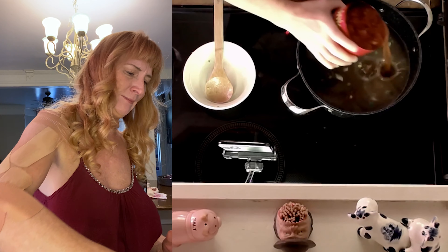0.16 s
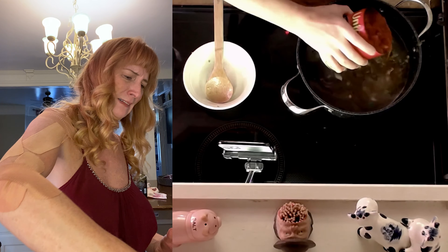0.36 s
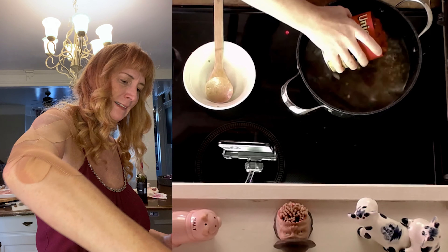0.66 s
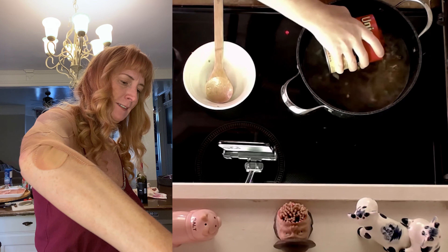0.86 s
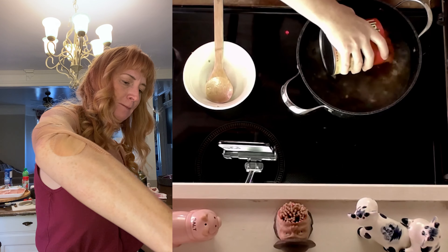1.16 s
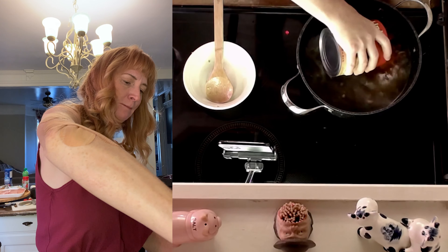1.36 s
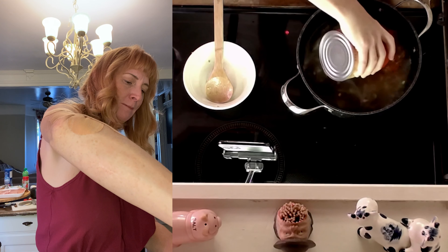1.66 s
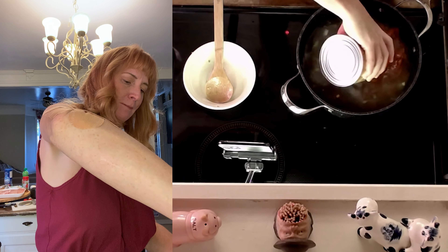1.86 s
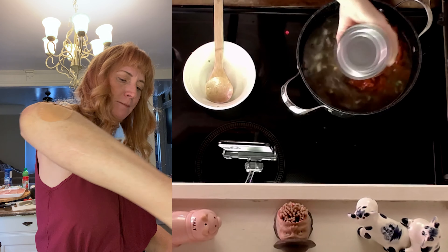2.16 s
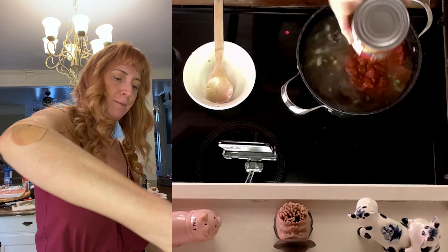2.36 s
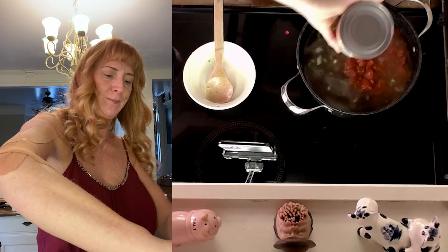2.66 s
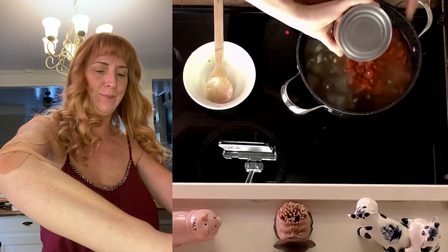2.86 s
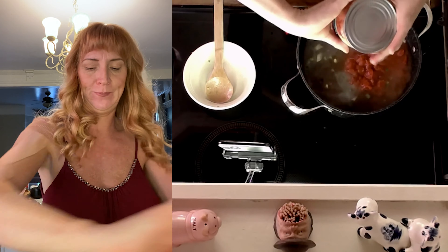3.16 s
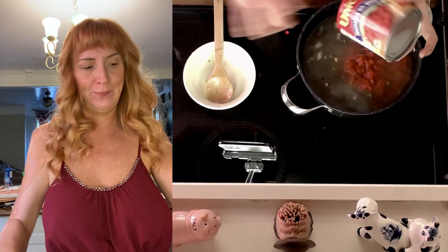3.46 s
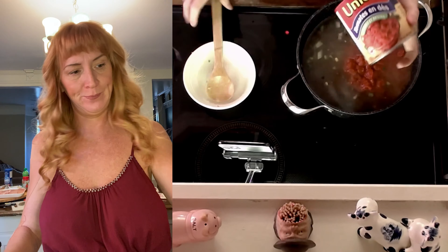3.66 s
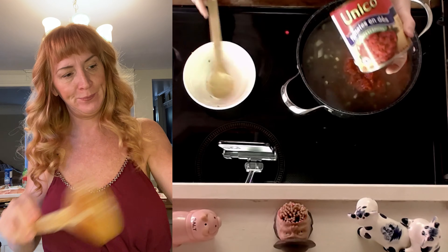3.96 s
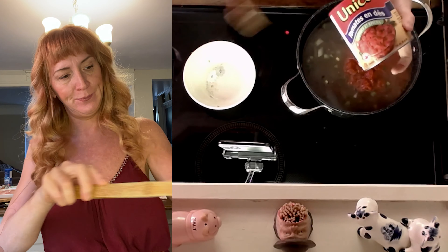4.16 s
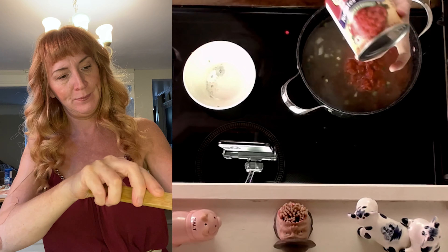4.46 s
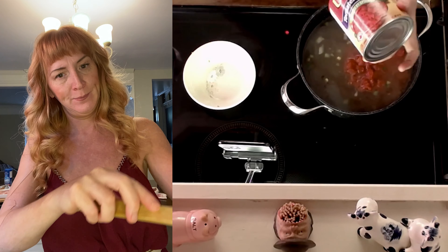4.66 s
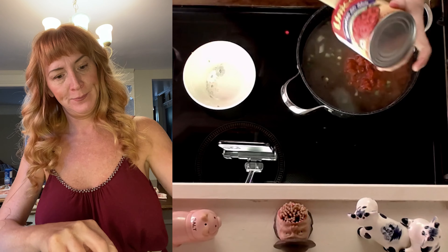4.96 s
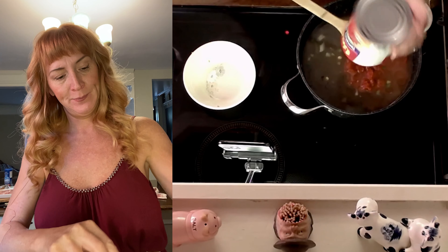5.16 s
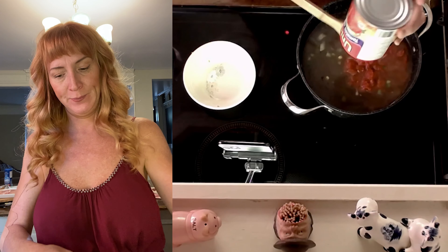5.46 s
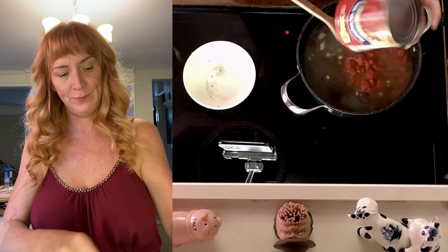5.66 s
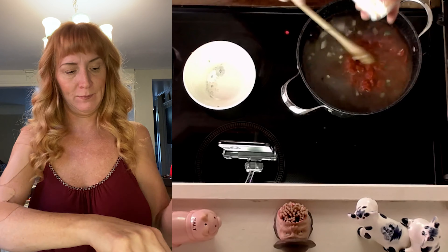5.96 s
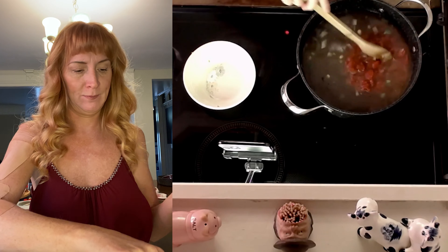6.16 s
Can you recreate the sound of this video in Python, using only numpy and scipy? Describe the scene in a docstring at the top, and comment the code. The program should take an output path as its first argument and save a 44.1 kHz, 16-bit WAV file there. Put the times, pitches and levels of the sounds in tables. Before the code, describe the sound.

In a small, fairly live kitchen, chunky tomatoes slide from a tin into broth with sharp wet slaps, squelches, bubbly plops and soft thuds. The gush thins to dribbles while a hand rubs the tin. A wooden spoon rattles quickly against a china bowl, then knocks inside the hollow can and scrapes it once, ending with light rim taps. Close stereo microphone, low stove rumble beneath.

```python
"""Over a low rumble, tomatoes slide from a tin into a pot of broth: bubble and film noise, squelches, plops of
gliding cavity tones and soft bass thuds. Then a hand shifts on the tin (stuttering friction noise), a wooden
spoon rattles against its bowl (decaying modes, clack, cooktop thump), and knocks and scrapes in the hollow tin
(struck modes, stick-slip exciting resonances), with light rim taps, high wet ticks in the broth and a brief
stir of the broth at the end. A small, fairly live kitchen answers into two close microphone ports."""
import sys
import numpy as np
from scipy import signal
from scipy.fft import rfft, irfft
from scipy.io import wavfile
from scipy.ndimage import uniform_filter1d

SR = 44100
rng = np.random.default_rng(int(sys.argv[2]) if len(sys.argv) > 2 else 0)


def output_pcm(signal):
    """Save a mono or channel-first signal as 16-bit PCM at the path in sys.argv[1].

    Samples are clipped to [-1, 1] before scaling.
    """
    pcm = np.clip(np.atleast_2d(signal).T, -1, 1) * 32767
    wavfile.write(sys.argv[1], SR, np.round(pcm).astype(np.int16))


N = 278094
TIME = np.arange(N) / SR  # s

# Levels are relative: each source sets its own balance.
# low rumble of pot and stove over time: t/s, level/dB
RUMBLE_LEVEL = [(0.0, -58), (0.21, -43.5), (0.45, -54), (1.3, -56.5), (1.75, -52), (2.8, -56), (4.1, -63),
                (5.151, -58.5), (5.55, -73.5), (5.7, -56.5), (6.31, -77)]
# rumble spectrum: f/Hz, level/dB
RUMBLE_SPECTRUM = [(20, -23), (40, -4.5), (55, 1), (68, 8), (90, -8), (125, -6.5), (165, -7), (230, -15.5),
                   (330, -24), (500, -35.5), (900, -77)]
# room air spectrum: f/Hz, level/dB
AIR_SPECTRUM = [(88, -33), (150, 5), (249, -8.5), (291, -8), (649, -19), (702, -14.5), (805, -22),
                (871, -13.5), (1170, -27), (1290, -18), (1450, -11.5), (4950, -37), (16000, -36)]
AIR_DB = -71.5
RUMBLE_WAVER_DB, RUMBLE_WAVER_HZ = 4, 6

# pulp running into the pot, first the gush, then dribbles, lastly a brief stir of the broth: start t/s, length
# t/s, bubble level/dB, crackle level/dB
FLOWS = [(0.013, 1.13, -52.5, -55.5), (1.438, 0.37, -63, -63.5), (2.094, 0.47, -76, -70.5),
         (6.225, 0.086, -89, -72)]
# drops in the broth, spectrum: f/Hz, level/dB
BUBBLE_SPECTRUM = [(200, -21.5), (450, -2.5), (700, -3), (1100, -6.5), (1800, -9.5), (3000, -16.5),
                   (4200, 5), (5500, -10.5), (8000, -22), (16000, -49)]
# sloshing broth, spectrum: f/Hz, level/dB
SLOSH_SPECTRUM = [(150, -10), (300, -3.5), (450, 3), (650, -1), (1000, -7.5), (1800, -6.5), (4200, -4),
                  (5500, -14.5), (8000, -24.5)]
# bursting films, spectrum: f/Hz, level/dB
CRACKLE_SPECTRUM = [(1000, -11), (4000, -10.5), (5500, -5), (7200, -7.5), (10000, -5), (13500, -3.5),
                    (16000, -16.5)]
FLOW_ATTACK_S, FLOW_SAG_DB_PER_S, FLOW_RELEASE_S = 0.026, -9.5, 0.3
LUMP_DB, LUMP_HZ = 3, 21.83  # the pulp comes in lumps

# chunks slapping into the pot: t/s, squelch level/dB, squelch centre f/Hz, tick level/dB, t60/s
SPLATS = [(0.029, -26, 3600, -48, 0.062), (0.039, -19.5, 3150, -23.5, 0.024),
          (0.0612, -30.5, 2330, -43, .03), (0.114, -31, 3200, -57, 0.047),
          (0.1296, -35, 2150, -39.5, 0.076), (0.2665, -46, 1220, -42.5, 0.028),
          (0.3117, -44.5, 1590, -39.5, .025), (0.387, -46.5, 1220, -43.5, 0.11),
          (0.436, -36.5, 1110, -55, 0.027), (0.487, -47.5, 1180, -47, 0.046),
          (0.7146, -45, 3700, -51.5, 0.022), (0.7784, -33.5, 1470, -39, 0.033),
          (0.832, -34, 4030, -55.5, .015), (0.8861, -29, 2700, -28, 0.096), (0.98, -34.5, 2050, -48, 0.029),
          (1.005, -37, 4250, -39, 0.027), (1.051, -25, 3950, -24.5, .03), (1.061, -25, 1950, -41, 0.042),
          (1.164, -42, 3130, -43, .025), (1.3361, -51, 1480, -55, 0.035), (1.501, -40.5, 4100, -57, 0.021),
          (1.644, -38.5, 3930, -42.5, 0.018), (1.699, -46.5, 2090, -62, 0.045),
          (1.7544, -39.5, 2190, -51.5, 0.015), (2.176, -57, 1640, -53.5, 0.027),
          (2.287, -48, 3440, -58, 0.022), (2.4072, -63, 1640, -57, 0.022), (2.993, -40.5, 2780, -52, 0.11)]
# dull push of pulp, spectrum: f/Hz, level/dB
PULP_SPECTRUM = [(120, -22), (300, -9.5), (480, 0.5), (680, 3), (1000, -19.5), (3000, -24)]
# crisp contact tick, spectrum: f/Hz, level/dB
TICK_SPECTRUM = [(1000, -34.5), (4000, -3.5), (5500, 0.5), (7000, 0.5), (10000, -4.5), (13000, -6.5),
                 (16000, -13.5)]
SPLAT_RISE_S = 0.0032

# air pockets closing behind the chunks: t/s, level/dB, settled f/Hz
PLOPS = [(.041, -5, 3866), (.044, -34, 708), (.061, -30.5, 2150), (.114, -25.5, 2910), (0.223, -34.5, 1616),
         (0.435, -39, 1142), (0.754, -36.5, 1830), (.78, -31.5, 1397), (.904, -28, 664),
         (0.959, -31.5, 2420), (0.981, -39, 686), (1.06, -22.5, 1983), (1.071, -34, 853),
         (1.131, -31, 2960), (1.502, -30.5, 4020), (1.635, -40, 1430)]
POCKET_HZ, POCKET_CYCLES = 1680, 59  # a pocket starts above POCKET_HZ and falls 60 dB in so many cycles

# lumps landing on the bottom of the pot: t/s, level/dB, mid-glide f/Hz, t60/s
THUDS = [(.046, -28, 118.3, 0.29), (0.623, -38, 160, 0.15), (0.891, -28.5, 127, 0.066),
         (1.562, -39.5, 149, 0.065), (1.686, -36, 155, 0.11), (1.79, -34, 143, 0.1),
         (2.999, -34, 129, 0.11)]

# hand and spoon sliding on the tin, one row a stroke:
# start t/s, length t/s, body level/dB, hiss level/dB
SLIDES = [(1.306, .3, -63.5, -66), (1.594, 0.073, -61.5, -59), (1.703, 0.18, -57.5, -69.5),
          (1.942, 0.38, -60, -63.5), (2.419, 0.34, -55.5, -65), (2.813, 0.074, -63, -52.5),
          (2.977, 0.082, -50, -58), (3.063, 0.078, -55.5, -50.5), (3.196, 0.28, -64, -85),
          (3.947, 0.086, -62.5, -68.5), (4.493, 0.48, -57.5, -86), (5.373, 0.039, -67, -62),
          (5.45, 0.33, -70.5, -69), (5.867, 0.045, -71.5, -79.5)]
# dull body of the friction, spectrum: f/Hz, level/dB
SLIDE_BODY = [(120, -16.5), (200, -4.5), (320, -9), (490, -2), (680, -13), (850, -5.5), (1150, -19),
              (1700, -15.5), (2780, -14.5), (4100, -15.5), (5600, -29), (8000, -52.5)]
# fine hiss of the friction, spectrum: f/Hz, level/dB
SLIDE_HISS = [(3000, -37), (5500, -5.5), (7500, 0), (10000, -1), (13500, -0.5), (16000, -4.5)]
SLIDE_ATTACK_S, SLIDE_SAG_DB_PER_S, SLIDE_RELEASE_S = 0.028, -8.5, 0.22
STUTTER_DB, STUTTER_HZ = 2.5, 38  # skin sticks and slips on the tin

# spoon against bowl: t/s, force level/dB, brightness/(dB per octave), cooktop thump level/dB
BOWL_KNOCKS = [(3.4583, -28, 0, -10), (3.4667, -8.5, 1, -3), (3.483, -6.5, -2, 0.5), (3.488, -6, -2.5, -2),
               (3.504, -23.5, -3, 10), (3.531, -19, -4.5, 6), (3.61, -15.5, -1.5, -6),
               (3.6238, -4.5, -1, -5), (3.684, -14, -1.5, -7.5), (3.6948, 1.5, 0.5, -3),
               (3.706, -16.5, -9, -15), (3.742, -25.5, 3, 9.5), (3.7649, -4, -0.5, -2)]
# modes of the china bowl: f/Hz, level/dB, t60/s
BOWL_MODES = [(327.5, -33.5, 0.31), (457, -16, 0.064), (507, -25, 0.22), (529, -29.5, 0.18),
              (869, -28.5, 0.27), (952, -26, 0.071), (1104, -29, 0.12), (1464, -31.5, 0.13),
              (1970, -20, 0.079), (1810, -29, .06), (2170, -30, 0.026), (2485, -38, 0.18),
              (2590, -28.5, 0.12), (4060, -35, .12), (7110, -33.5, 0.07), (10900, -46.5, 0.1),
              (11400, -47.5, 0.078), (12600, -49, .08)]
# wood on china, clack spectrum: f/Hz, level/dB
BOWL_CLACK = [(100, -9), (420, 0.5), (700, -3.5), (1300, -4.5), (2000, -4), (2900, -4.5), (4200, -10),
              (5500, -21), (9000, -35.5), (13000, -35.5), (16000, -54)]
# modes of the glass cooktop: f/Hz, level/dB, t60/s
COOKTOP_MODES = [(65.7, -33.5, 0.45), (104.5, -20.5, 0.25), (150.3, -18.5, 0.24), (230, -37, 0.35)]

# spoon against tin: t/s, force level/dB, brightness/(dB per octave), held-tin thump level/dB
TIN_KNOCKS = [(4.313, -36.5, 4.5, -9), (4.3352, -3, -2, -22), (4.354, -20.5, -3.5, -20),
              (4.448, -24.5, 3, -13.5), (4.4648, -13, 3, 7.5), (4.8, -15.5, -4, -17.5),
              (4.867, -22.5, 8, -10)]
# modes of the air in the tin and its wall: f/Hz, level/dB, t60/s
TIN_MODES = [(127, -40, 0.23), (313.4, -33.5, 0.13), (486, -20.5, .2), (532, -11.5, 0.17),
             (559.7, -5.5, .04), (629, -17, 0.088), (890.4, -18.5, 0.13), (1000, -17.5, 0.051),
             (1275, -18.5, 0.071), (1450, -21, 0.052), (2079, -30.5, 0.075), (2210, -33.5, 0.048),
             (2840, -29, 0.072)]
# wood on tin, clack spectrum: f/Hz, level/dB
TIN_CLACK = [(150, -27.5), (400, -4), (600, 6), (1000, -9.5), (1600, -12.5), (2900, -19), (4200, -25),
             (5500, -37.5), (11000, -46), (16000, -60)]
# dull body of the held tin, spectrum: f/Hz, level/dB
TIN_BODY = [(80, -29), (150, -2.5), (200, -4.5), (300, 6.5), (400, -7.5), (700, -2.5), (1100, -21),
            (2000, -11.5), (5000, -39.5)]

# rasp of wood on the tin wall, spectrum: f/Hz, level/dB
RASP_SPECTRUM = [(90, -26), (150, -6.5), (400, -12.5), (900, -6), (1150, -9), (1700, -3.5), (2050, -1.5),
                 (2750, 5), (3300, -10.5), (4000, 0), (5300, -17), (7000, -17.5), (11000, -38),
                 (16000, -50.5)]
# the spoon first wipes through the wet film
WIPE_START_S, WIPE_ATTACK_S, WIPE_DB_PER_S, WIPE_DB = 4.596, 0.15, 49, -64.5
# it then glides in with growing pressure, bites into the wall and lets go
DRAG_START_S, BITE_START_S, DRAG_END_S = 4.697, 4.812, 4.876
DRAG_ATTACK_S, PRESS_DB_PER_S, DRAG_RELEASE_S = 0.062, 157, 0.09
BITE_ATTACK_S, BITE_RELEASE_S = 0.0056, 0.054
HOLLOW_HZ, HOLLOW_SAG_HZ_PER_S = 653.6, 276  # the air in the tin sinks in pitch as the spoon goes in
HOLLOW_DB, GLIDE_RASP_DB, BITE_RASP_DB = -38.5, -66.5, -28.5  # as each sets in
AFTER_RING_DB, AFTER_RING_S = -34.5, 0.41  # the bottom of the tin rings on with this t60

# light high tinks: taps of the spoon on the rim of the tin and wet ticks in the broth: t/s, level/dB, f/Hz
TINKS = [(4.9833, -51, 10800), (5.055, -33.5, 4699), (5.394, -48.5, 11340), (5.783, -43.5, 4677)]
TINK_T60_S, TINK_TICK_DB = 0.031, -15

# reverberation of the kitchen: f/Hz, t60/s
KITCHEN_T60 = [(100, 0.27), (400, 0.38), (900, 0.58), (2500, 0.6), (6000, 0.46), (10000, 0.49),
               (14000, 0.22)]
# reflections alike in both ports: f/Hz, level/dB
ROOM_SHARED = [(25, -13), (100, 6.5), (500, 1), (1200, -1), (2600, -1.5), (6000, -6.5), (14000, 1)]
# reflections that differ between the ports: f/Hz, level/dB
ROOM_APART = [(60, -34), (150, -24), (300, -13), (550, -5), (1200, -1), (2600, 1), (6000, -4), (14000, -6)]
# microphone response: f/Hz, level/dB
MICROPHONE = [(20, -11.5), (40, -4), (60, -1), (10000, 2), (13000, -1.5), (14500, -3), (16000, -13)]
EDGE_HZ = 15800  # upper band limit


def amp(db):
    """Logarithmic level: decibels to gain."""
    return 10 ** (np.asarray(db) / 20)


def unit(x):
    """Normalisation: scales to an rms of one."""
    return x / np.sqrt(np.mean(x ** 2) + 1e-20)


def read(points, hz):
    """Interpolation of a spectrum along log frequency."""
    f, value = np.transpose(points)
    return np.interp(np.log(hz + 1), np.log(f + 1), value)


def swell(s, db):
    """Amplitude modulation: gain from a level curve, -120 dB outside it."""
    return amp(np.interp(TIME, s, db, left=-120, right=-120))


def add(mix, s, sound):
    """Superposition: mixes a sound in at time s."""
    part = mix[max(round(s * SR), 0):][:len(sound)]
    part += sound[:len(part)]


def colour(x, points):
    """Minimum-phase filtering: a causal filter with the given spectrum."""
    hz = abs(np.fft.fftfreq(4096, 1 / SR))
    log_gain = np.log(amp(read(points, hz)))
    # the Hilbert transform of the log gain supplies the phase
    taps = np.fft.ifft(np.exp(np.conj(signal.hilbert(log_gain)))).real
    return signal.fftconvolve(x, taps[:len(taps) // 2])[:len(x)]


def fade(t, t60):
    """Exponential damping: 60 dB in t60."""
    return np.exp(-np.log(1000) * t / np.maximum(t60, 1e-3))


def stroke(start, length, attack, slope_db, release):
    """Envelope: smooth attack, hold sloping by slope_db a second, exponential release of the given t60."""
    t = np.maximum(TIME - start, 0)
    onset = np.sin(np.pi / 2 * np.minimum(t / attack, 1)) ** 2
    return onset * amp(slope_db * np.minimum(t, length)) * fade(np.maximum(t - length, 0), release)


def wobble(hz):
    """Sum of sines at random phases: irregular motion of rms one around the given rate."""
    rates = hz * np.geomspace(.5, 2, num=12)
    return unit(sum(np.sin(2 * np.pi * (f * TIME + rng.random())) for f in rates))


def noise(points):
    """Spectral shaping: steady noise of rms one with the given spectrum."""
    white = rfft(rng.standard_normal(N))
    return unit(irfft(white * amp(read(points, np.fft.rfftfreq(N, 1 / SR))), N))


def grains(per_s, spread_db):
    """Random point process: clicks of uneven size and sign."""
    size = amp(spread_db * np.minimum(rng.exponential(1, N), 3.5))
    return size * rng.choice([-1, 1], N) * (rng.random(N) < per_s / SR)


def clumping(length, window):
    """Moving average of noise: slow random motion of rms one, window in samples."""
    return unit(uniform_filter1d(rng.standard_normal(length), size=window))


def bubbles(low_hz, high_hz, per_s, cycles, glide):
    """Damped bubble resonance: ringing drops of 18 sizes, each size bending up or down to its pitch."""
    t, out = TIME[:SR // 12], np.zeros(N)
    for hz in np.geomspace(low_hz, high_hz, num=18):
        pitch = hz * (1 + glide * rng.uniform(-0.55, 1) * np.exp(-t / 0.0036))
        envelope = fade(t, cycles / hz) * (1 - np.exp(-t * hz / 2))
        drip = np.sin(2 * np.pi * np.cumsum(pitch) / SR) * envelope
        out += signal.oaconvolve(grains(per_s, spread_db=6.5), drip * hz)[:N]
    return unit(out)


def spray(points, t60, rise, clump=0.98):
    """Clumped noise burst: tiny ruptures with the given spectrum, scaled by the rms of the first 10 ms."""
    t = TIME[:SR // 5]
    clumps = np.exp(clump * np.tanh(clumping(len(t), 40)))
    envelope = fade(t, t60) * (1 - np.exp(-t / rise))
    burst = colour(rng.standard_normal(len(t)) * clumps * envelope, points)
    return burst / np.sqrt(np.mean(burst[:SR // 100] ** 2))


def ring(modes, tilt, rise, scatter=0.0067):
    """Modal synthesis: damped modes of a struck body in close pairs; tilt in dB per octave brightens them."""
    t, tones = TIME[:SR // 2], 0
    for k, (hz, db, t60) in enumerate(modes):
        # each blow detunes the pair slightly at random, so its ring beats and varies a little
        own, twin = hz * (1 + scatter * rng.standard_normal(2) * [.5, 2])
        pair = np.sin(2 * np.pi * own * t) + .5 * np.sin(2 * np.pi * twin * t)
        gain = (-1) ** k * amp(db - 1.5 + tilt * np.log2(hz / 800))
        tones = tones + gain * fade(t, t60) * pair
    return tones * (1 - np.exp(-t / rise))


def clack(points, tilt, t60):
    """High modal density: quickly damped noise stands for the crowded modes at a contact."""
    t = TIME[:SR // 2]
    burst = rng.standard_normal(len(t)) * fade(t, t60) * (1 - np.exp(-t / 0.00013))
    tilted = [(hz, db + tilt * np.log2(hz / 800)) for hz, db in points]
    return colour(burst / np.linalg.norm(burst), tilted)


def resonate(x, hz, width):
    """Resonance: a one-pole filter of bandwidth width/Hz, turned to follow the pitch curve hz."""
    turn = np.exp(2j * np.pi * np.cumsum(hz * np.ones(N)) / SR)
    r = np.exp(-np.pi * width / SR)
    return 2 * (turn * signal.lfilter([1 - r], [1, -r], x / turn)).real


def background():
    """Coherence: wavering rumble is alike in both ports, still air has a small part that differs."""
    waver = amp(RUMBLE_WAVER_DB * wobble(RUMBLE_WAVER_HZ))
    rumble = amp(2.0) * noise(RUMBLE_SPECTRUM) * swell(*np.transpose(RUMBLE_LEVEL)) * waver
    apart = np.array([noise(AIR_SPECTRUM), noise(AIR_SPECTRUM)])
    return rumble + amp(AIR_DB) * (noise(AIR_SPECTRUM) + 0.2 * apart)


def patter():
    """Bubble resonance and film rupture: running pulp gives a grainy slosh, drops, small plops and crackle."""
    drops = unit(colour(bubbles(450, 4700, per_s=18, cycles=36, glide=.25), BUBBLE_SPECTRUM))
    slosh = amp(-3) * unit(colour(grains(per_s=700, spread_db=5), SLOSH_SPECTRUM))
    gurgle = amp(1) * bubbles(700, 3300, per_s=7, cycles=40, glide=.4)
    broth = amp(-1.5) * drops + slosh + gurgle
    fizz = bubbles(6800, 14000, per_s=10, cycles=35, glide=0.17)
    fizz = fizz + amp(-2.5) * unit(grains(per_s=130, spread_db=4))
    crackle, out = unit(colour(fizz, CRACKLE_SPECTRUM)), np.zeros(N)
    for s, length, bubble_db, crackle_db in FLOWS:
        flow = stroke(s, length, FLOW_ATTACK_S, FLOW_SAG_DB_PER_S, FLOW_RELEASE_S)
        out += flow * (amp(bubble_db) * broth + amp(crackle_db) * crackle)
    return out * unit(amp(LUMP_DB * wobble(LUMP_HZ)))


def splats(width_db=9, damp_db=20):
    """Impact and rupture: a squelch round its own pitch, a dull push of pulp, a crisp tick of breaking film."""
    out, f = np.zeros(N), np.geomspace(100, 16000, num=30)
    for s, squelch_db, hz, tick_db, t60 in SPLATS:
        # slopes in dB per octave, with extra damping above 4800 Hz
        shape = -width_db * abs(np.log2(f / hz)) - damp_db * np.maximum(np.log2(f / 4800), 0)
        squelch = spray(np.transpose([f, shape]), t60, SPLAT_RISE_S)
        push = amp(-19) * spray(PULP_SPECTRUM, 2 * t60, rise=0.012)
        tick = spray(TICK_SPECTRUM, 0.51 * t60, 0.33 * SPLAT_RISE_S)
        add(out, s, amp(squelch_db - 7.5) * (squelch + push) + amp(tick_db - 4.0) * tick)
    return out


def plops(glide=0.0016, rise=0.00066):
    """Cavity resonance: an air pocket drops fast to its pitch; low ones drop further and ring longer."""
    out, t = np.zeros(N), TIME[:SR // 4]
    for s, db, settled_hz in PLOPS:
        drop_hz = np.hypot(settled_hz, POCKET_HZ) - settled_hz
        hz = settled_hz + drop_hz * np.exp(-t / glide)
        shape = fade(t, POCKET_CYCLES / settled_hz) * (1 - np.exp(-t / rise))
        add(out, s, amp(db) * shape * np.sin(2 * np.pi * np.cumsum(hz) / SR))
    return out


def thuds(sag=0.43):
    """Damped low-frequency oscillation: soft pushes whose pitch sags as the lump settles."""
    out, t = np.zeros(N), TIME[:SR // 2]
    for s, db, hz, t60 in THUDS:
        pitch = hz * (1 + sag * (np.exp(-t / 0.02) - .5))
        envelope = fade(t, t60) * (1 - np.exp(-t / 0.0012))
        add(out, s, amp(db) * envelope * np.sin(2 * np.pi * np.cumsum(pitch) / SR))
    return out


def slides():
    """Friction noise: a dull body and grainy hiss stutter; each stroke eases off as it goes."""
    body = noise(SLIDE_BODY)
    hiss = unit(colour(grains(per_s=11000, spread_db=7.0), SLIDE_HISS))
    out = np.zeros(N)
    for s, length, body_db, hiss_db in SLIDES:
        rub = stroke(s, length, SLIDE_ATTACK_S, SLIDE_SAG_DB_PER_S, SLIDE_RELEASE_S)
        out += rub * (amp(body_db - 4) * body + amp(hiss_db - 6.5) * hiss)
    return out * unit(amp(STUTTER_DB * wobble(STUTTER_HZ)))


def bowl():
    """Impulsive modal excitation: the spoon gives a woody clack and the short ring of the china."""
    out = np.zeros(N)
    for s, db, tilt, _ in BOWL_KNOCKS:
        china = amp(-2.0) * ring(BOWL_MODES, tilt, rise=0.00065, scatter=0.012)
        wood = amp(18.5) * clack(BOWL_CLACK, tilt, t60=0.049)
        add(out, s, amp(db) * (china + wood))
    return out


def cooktop():
    """Structure-borne sound: each knock on the bowl thumps the glass under it."""
    out = np.zeros(N)
    for s, db, _, thump_db in BOWL_KNOCKS:
        add(out, s, amp(db + thump_db - 1) * ring(COOKTOP_MODES, 0, rise=.005))
    return out


def tin_knocks():
    """Impulsive modal excitation: struck, the hollow tin rings, clacks woodily and thumps dully."""
    out = np.zeros(N)
    for s, db, tilt, thump_db in TIN_KNOCKS:
        wood = amp(23.0) * clack(TIN_CLACK, tilt, t60=.035)
        thump = amp(thump_db + 19) * clack(TIN_BODY, 0, t60=.06)
        add(out, s, amp(db) * (ring(TIN_MODES, tilt, rise=0.0029) + wood + thump))
    return out


def hollow_air(slips, throb=.3, waver=0.0182):
    """Air-column resonance: an unsteady tone and slip-driven ringing sink as the spoon goes in."""
    pitch = HOLLOW_HZ - HOLLOW_SAG_HZ_PER_S * (np.clip(TIME, DRAG_START_S, DRAG_END_S) - DRAG_START_S)
    pressure = clumping(N, 400)  # the uneven push of the hand
    sine = np.sin(2 * np.pi * np.cumsum(pitch * (1 + waver * pressure)) / SR)
    # rolled by a second, the pressure moves the level apart from the pitch
    tone = unit(sine * np.exp(throb * np.roll(pressure, SR)))
    ringing = resonate(resonate(slips, .95 * pitch, width=97), .95 * pitch, width=160)
    return amp(-3.5) * tone + amp(-5.5) * unit(ringing)


def scrape(wall_hz=888, bottom_hz=495):
    """Stick-slip friction: slips rasp on the wall and excite the resonances of the tin."""
    drag_length, bite_length = DRAG_END_S - DRAG_START_S, DRAG_END_S - BITE_START_S
    press = stroke(DRAG_START_S, drag_length, DRAG_ATTACK_S, 0, DRAG_RELEASE_S)
    press = press * amp(PRESS_DB_PER_S * (np.minimum(TIME, BITE_START_S) - DRAG_START_S))
    wipe = stroke(WIPE_START_S, DRAG_END_S - WIPE_START_S, WIPE_ATTACK_S, WIPE_DB_PER_S, DRAG_RELEASE_S)
    bite = stroke(BITE_START_S, bite_length, BITE_ATTACK_S, 0, BITE_RELEASE_S)
    after = stroke(BITE_START_S, bite_length, BITE_ATTACK_S, 0, AFTER_RING_S)

    slips = grains(per_s=1500, spread_db=2)
    wall = unit(resonate(resonate(slips, wall_hz, width=5.3), wall_hz, width=54))
    bottom = unit(resonate(resonate(slips, bottom_hz, width=25), bottom_hz, width=100))
    dull = unit(colour(slips, TIN_BODY))
    body = hollow_air(slips) + amp(-19.5) * wall + amp(-9.5) * bottom + amp(-15.5) * dull
    grit = slips * np.exp(.5 * np.tanh(clumping(N, 180)))  # the wood sticks and slips in bursts
    rasp = unit(colour(grit, RASP_SPECTRUM))
    hiss = unit(colour(slips, SLIDE_HISS))

    glide = press * (amp(HOLLOW_DB) * body + amp(GLIDE_RASP_DB) * rasp)
    film = amp(WIPE_DB) * wipe * hiss
    after_ring = np.sin(2 * np.pi * bottom_hz * TIME) + amp(-7.5) * wall + amp(-18) * rasp
    return glide + film + amp(BITE_RASP_DB) * bite * rasp + amp(AFTER_RING_DB) * after * after_ring


def tinks():
    """Modal ringing: a short, bright tink and the tick of the contact, from the tin's rim or a wet drop."""
    out = np.zeros(N)
    for s, db, hz in TINKS:
        tink = ring([(hz, 0, TINK_T60_S), (.85 * hz, -8, TINK_T60_S)], 0, rise=0.00045)
        add(out, s, amp(db) * tink)
        add(out, s, amp(db + TINK_TICK_DB) * spray(TICK_SPECTRUM, .015, rise=0.00058))
    return out


def kitchen(x, early=4, early_t60=0.063, build=0.0005):
    """Reverberation: sparse reflections die band by band; the ports share the bass and differ in treble."""
    count, spacing = 1600, 20  # one reflection at random in each spacing of samples
    taps = np.zeros((2, count * spacing))
    at = np.arange(count) * spacing + rng.integers(0, spacing, (2, count))
    np.put_along_axis(taps, at, rng.choice([-1., 1.], at.shape), 1)
    hz, t, z = signal.stft(taps, SR, nperseg=256)
    late_decay = fade(t, read(KITCHEN_T60, hz)[:, None])
    early_decay = early * fade(t, early_t60)  # the stove back and hood answer first
    z *= (late_decay + early_decay) * (1 - np.exp(-t / build))
    mid, side = signal.istft(z, SR)[1]
    shared, apart = colour(mid, ROOM_SHARED), colour(side, ROOM_APART)
    tail = np.array([shared + apart, shared - apart]) / np.linalg.norm(mid)
    return signal.fftconvolve(x[None], tail, axes=1)[:, :N]


def place(x, pan_db, wet_db):
    """Time and level differences: direct sound is 4 samples late at the left port; the kitchen answers."""
    late = np.concatenate([np.zeros(4), x[:-4]])
    direct = np.array([late * amp(pan_db / 2), x * amp(-pan_db / 2)])
    return direct + amp(wet_db) * kitchen(x)


def scene():
    """Superposition in one kitchen; the stove's bass reaches both ports alike."""
    pot = place(patter() + splats() + plops(), pan_db=1.5, wet_db=-7.0)
    bass = thuds() + cooktop()
    stove = bass + amp(-10) * kitchen(bass).mean(axis=0)
    hand = place(slides(), pan_db=0.5, wet_db=-3)
    spoon = place(bowl(), pan_db=3.0, wet_db=-8.0)
    knocks = place(tin_knocks(), pan_db=-2.0, wet_db=-9.5)
    drag = place(scrape(), pan_db=-1.5, wet_db=-8.5)
    rim = place(tinks(), pan_db=0, wet_db=-18)
    return background() + pot + stove + hand + spoon + knocks + drag + rim


def record(dry):
    """Linear filtering: the microphone's soft ends and the recorder's band limit."""
    heard = np.array([colour(side, MICROPHONE) for side in dry])
    band_limit = signal.firwin(255, EDGE_HZ, window=("kaiser", 9), fs=SR)
    return signal.oaconvolve(heard, band_limit[None], "same")


dry = scene()
out = record(dry)
output_pcm(out)
```